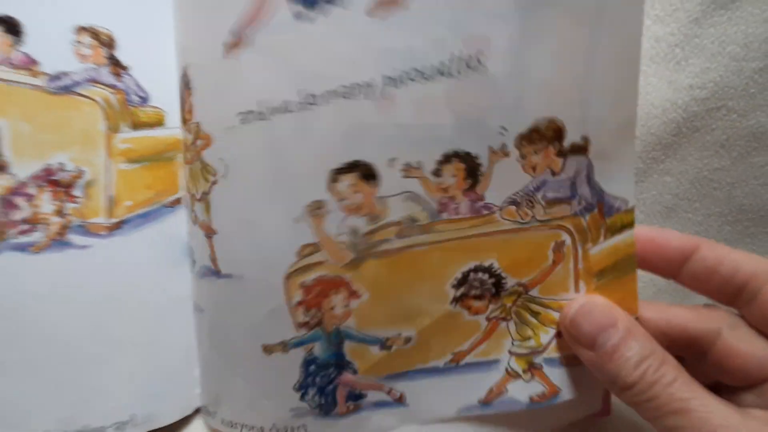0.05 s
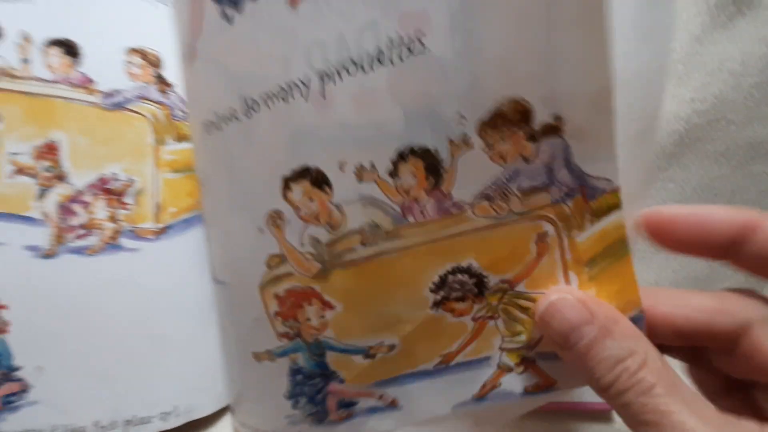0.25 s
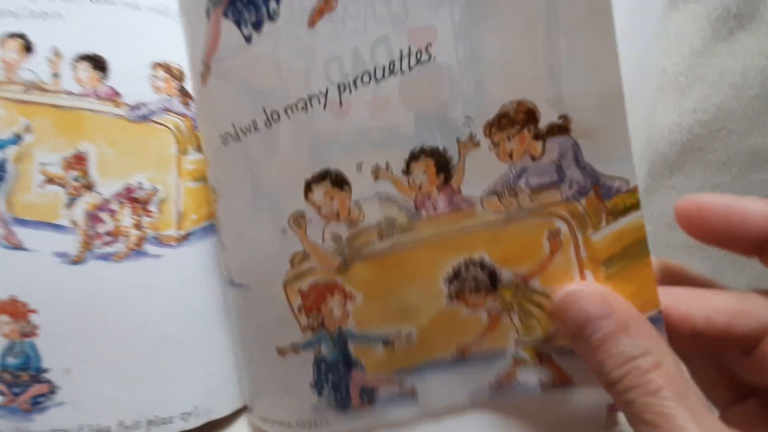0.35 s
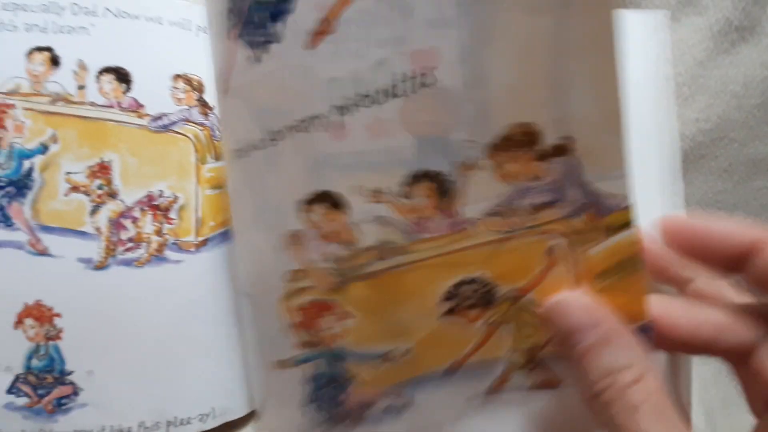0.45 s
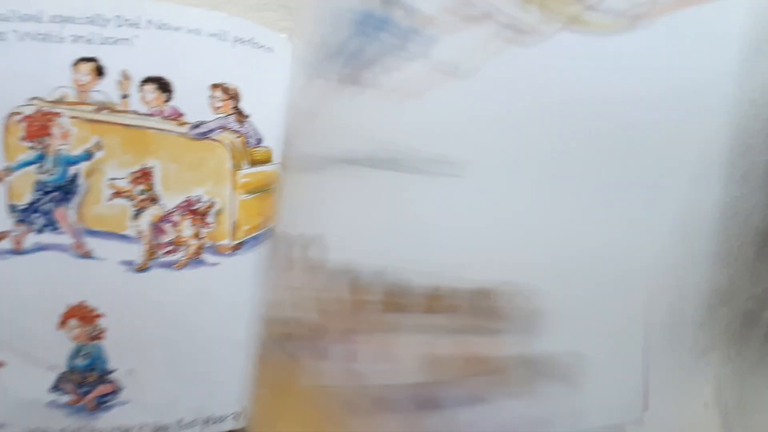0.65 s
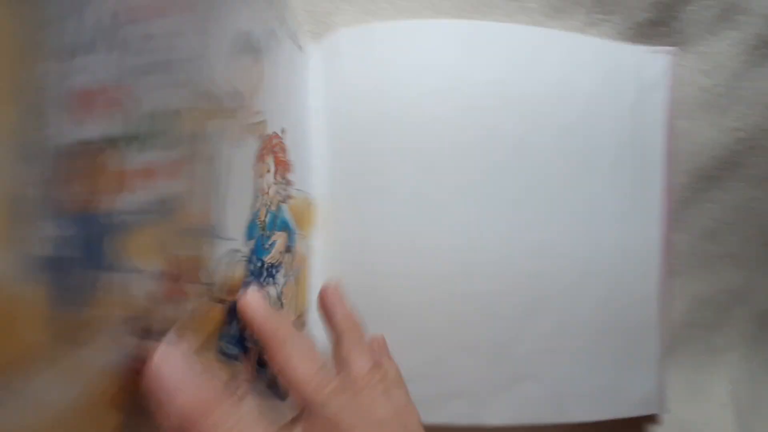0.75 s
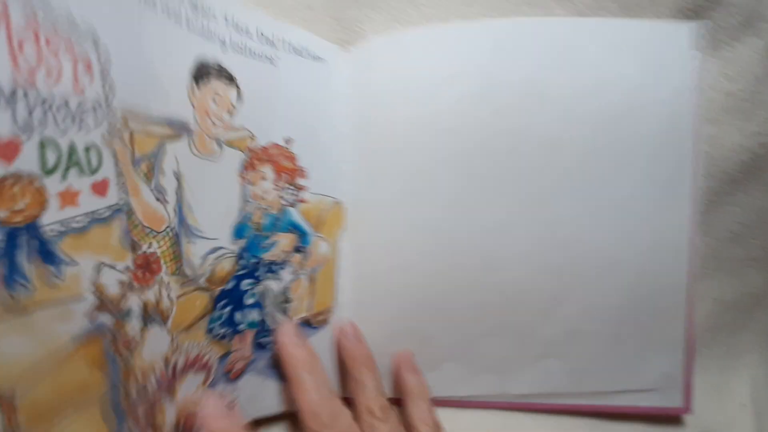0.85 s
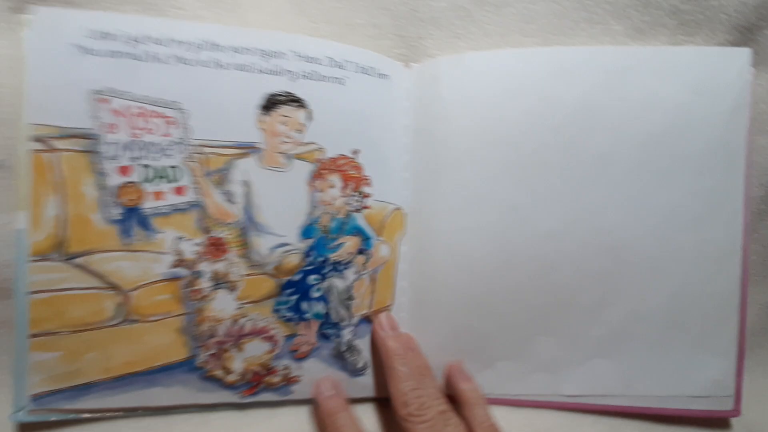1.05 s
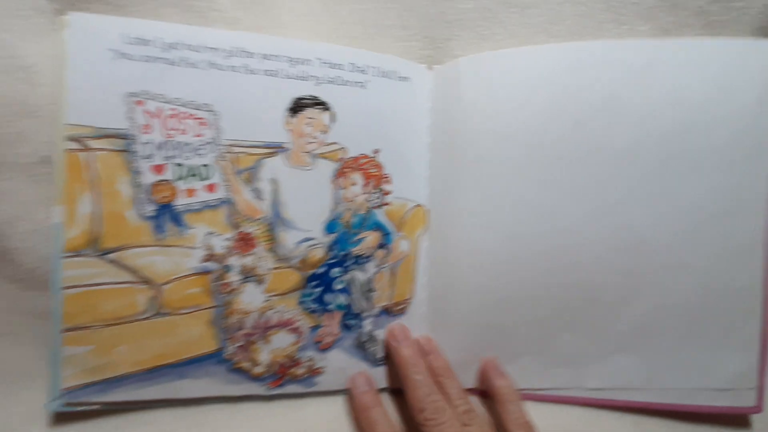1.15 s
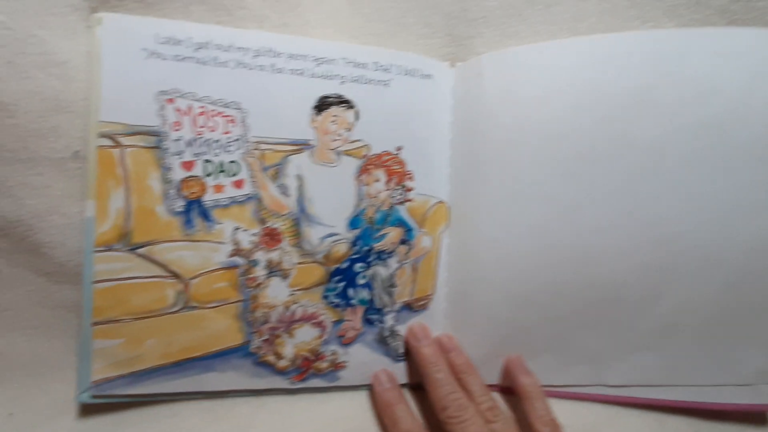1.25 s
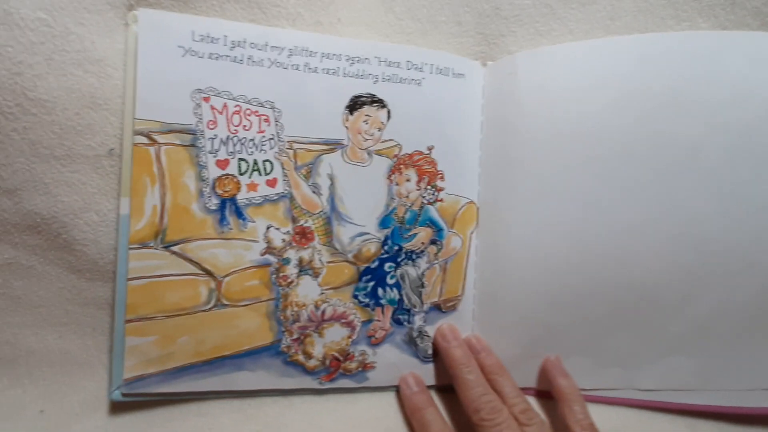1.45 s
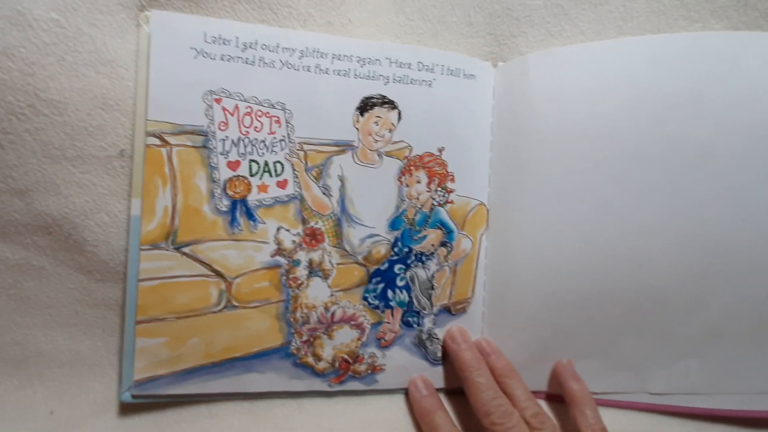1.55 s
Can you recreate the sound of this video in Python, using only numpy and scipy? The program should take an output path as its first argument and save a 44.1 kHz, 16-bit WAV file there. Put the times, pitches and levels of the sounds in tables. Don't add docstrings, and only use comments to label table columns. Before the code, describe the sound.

Close stereo pickup of a single heavy paper page turning, mostly left of centre: rustle and buckling pops, a brief lull, loud crisp snaps, a low soft thump, light skin rubbing and a last sticky tick at right.

```python
import sys
import numpy as np
from scipy import signal
from scipy.io import wavfile
from scipy.ndimage import uniform_filter1d

SR = 44100
rng = np.random.default_rng(int(sys.argv[2]) if len(sys.argv) > 2 else 0)


def ratio(d):
    e = np.asarray(d, float) / 20
    return 10 ** e


def transcribe(signal):
    frames = np.atleast_2d(signal).T
    limited = np.clip(frames, -1, 1)
    pcm = np.round(limited * 32767).astype(np.int16)
    wavfile.write(sys.argv[1], SR, pcm)


N = 70560


def rms_one(x):
    return x / np.sqrt(np.mean(x ** 2) + 1e-20)


def at_hz(points, hz):
    point_hz, value = np.transpose(points)
    return np.interp(np.log(hz), np.log(point_hz), value)


def drift(rate_hz):
    r = np.exp(-40 * np.pi * rate_hz / SR)
    slow = signal.lfilter([1], [1, -2 * r, r * r], rng.standard_normal(N // 20 + 2002))[2000:]
    return np.interp(np.arange(N) / 20, np.arange(len(slow)), rms_one(slow))


def peak(x, hz, width_hz):
    r = np.exp(-np.pi * width_hz / SR)
    zeros = np.array([1, 0, -1]) * (1 - r * r) / 2
    poles = [1, -2 * r * np.cos(2 * np.pi * hz / SR), r * r]
    return signal.lfilter(zeros, poles, x)


def grains(per_s, spread_db, size):
    chance, strength, sign = rng.random((3, *size))
    clicks = (chance < per_s / SR) * ratio(-spread_db * np.log(strength + 0.0026))
    return rms_one(clicks * np.sign(sign - .5))


def banded(spectrum, white, patchy_db, rate_hz):
    # (frequency [Hz], left-right likeness [-1..1])
    likeness = [(40, 0.1), (250, 0.23), (600, 0.97), (1500, -0.52), (3000, -0.42), (8000, -0.024),
                (14000, 0.064)]
    out, together = 0, drift(rate_hz)
    low_hz, high_hz = spectrum[0][0], spectrum[-1][0]
    edges_hz = np.geomspace(low_hz, high_hz, int(3 * np.log2(high_hz / low_hz)) + 1)
    for k, (low, high) in enumerate(zip(edges_hz, edges_hz[1:])):
        sos = signal.butter(2, [low, high], "band", fs=SR, output="sos")
        mid, side = signal.sosfilt(sos, white[k % 2])
        hz = np.sqrt(low * high)
        alike = np.clip(at_hz(likeness, hz), -.95, .95)
        flicker_db = patchy_db * (together + 1.2 * drift(rate_hz))
        stereo = np.sqrt(1 + alike) * mid + np.sqrt(1 - alike) * side * [[1], [-1]]
        out = out + ratio(at_hz(spectrum, hz) + flicker_db) * stereo
    return rms_one(out)


def gate(start_s, length_s, rise_s, fall_s):
    t = np.arange(N) / SR - start_s
    return np.clip(t / rise_s, 0, 1) * np.exp(-np.maximum(t - length_s, 0) / fall_s)


def placed(x, share):
    # (time [s], left minus right [dB])
    place = [
        (0, 8.5),
        (.45, 8),
        (.52, -1),
        (.59, 13.5),
        (0.679, 14),
        (.72, 3.5),
        (.77, 7.5),
        (1.201, 6.5),
        (1.6, -10.5),
    ]
    s, left_db = np.transpose(place)
    return x * ratio(share * np.interp(np.arange(N) / SR, s, left_db) * [[.3], [-.7]])


def strokes():
    # (time [s], length [s], rub level [dB], flex level [dB], air level [dB])
    stroke_table = [(0.0, 0.024, -51, -59, -62), (0.03, 0.079, -47.5, -47, -54),
                    (0.133, 0.019, -85, -100, -46.5), (0.157, 0.063, -57, -52, -64),
                    (0.195, 0.029, -48, -39, -51), (0.244, 0.012, -39, -65, -41.5),
                    (.265, 0.0099, -46, -28, -34), (0.274, 0.048, -50, -43, -43.5),
                    (0.3, 0.027, -38.5, -40, -56), (0.336, 0.024, -36, -27.5, -38),
                    (0.369, 0.065, -37, -37, -48.5), (0.507, 0.034, -63.5, -54, -47.5),
                    (0.553, 0.041, -54, -56.5, -54), (0.59, 0.028, -39, -36.5, -40.5),
                    (0.639, 0.025, -42, -48.5, -83.5), (0.662, 0.023, -40, -30, -30),
                    (0.695, 0.032, -70.5, -30, -32), (0.75, 0.03, -40, -35, -31),
                    (0.778, 0.057, -41.5, -37.5, -40.5), (0.843, 0.031, -41, -49.5, -43),
                    (0.875, 0.051, -43, -59, -54.5), (0.918, 0.043, -75.5, -47.5, -55.5),
                    (0.964, 0.082, -54, -66.5, -68.5), (1.077, 0.082, -56, -81, -95.5),
                    (1.118, 0.061, -52.5, -87, -97), (1.185, 0.036, -59.5, -85, -80),
                    (1.269, 0.048, -78.5, -93, -77.5), (1.328, 0.035, -67, -81, -86),
                    (0.669, .005, -39.5, -62, -56.5)]
    # (frequency [Hz], level [dB per Hz])
    rub_spectrum = [(700, -50), (1050, -27.5), (1350, -9.5), (2030, -12), (6080, -16.5), (8550, -22),
                    (15200, -23.5), (15900, -17), (16500, -35)]
    flex_spectrum = [(88, -37), (150, -9), (485, -6.5), (794, 1), (1360, -4), (2070, -6), (2450, 2.5),
                     (3390, -17), (6000, -31), (7800, -47.5), (13200, -120)]
    air_spectrum = [(25, -23.5), (50, -10), (80, -6), (130, -10), (250, -14), (500, -23)]
    shapes = np.array([gate(s, length_s, 0.0018 + 0.21 * length_s, 0.0013 + 0.33 * length_s)
                       for s, length_s, *_ in stroke_table])
    power = ratio(2 * np.array(stroke_table)[:, 2:].T)
    rub, flex, air = np.sqrt(power @ shapes ** 2)
    air = uniform_filter1d(air, size=600)

    hiss = banded(rub_spectrum, grains(15000, 2.0, size=(2, 2, N)), patchy_db=1.2, rate_hz=70)
    hiss = signal.sosfilt(signal.butter(4, 1100, "high", fs=SR, output="sos"), hiss)
    rustle = banded(flex_spectrum, grains(4000, 2.5, size=(2, 2, N)), patchy_db=1.5, rate_hz=50)
    puff = banded(air_spectrum, rng.standard_normal((2, 2, N)), patchy_db=0.0, rate_hz=11)
    return placed(rub * hiss + flex * rustle, share=0.31) + placed(air * puff, share=0.64)


def room_hush():
    # (frequency [Hz], level [dB per Hz])
    hush_spectrum = [(25, -15.5), (100, -0.5), (800, -25), (1100, -20), (1400, -1.5), (2600, -8),
                     (4200, -18.5), (6000, -15), (16500, -17.5)]
    return ratio(-69) * banded(hush_spectrum, rng.standard_normal((2, 2, N)), patchy_db=0.5, rate_hz=25)


def pops():
    # (time [s], peak level [dB], pitch [Hz], length [s], right minus left [dB])
    pop_table = [(.051, -33, 1700, .001, -6), (.0555, -31, 1950, .0015, -6), (.0595, -31, 1950, .0015, -6),
                 (.0675, -33, 1800, .0015, -6), (.073, -33, 1650, .001, -6), (.095, -36, 2100, .0015, -6),
                 (.1003, -34, 2000, .0015, -6), (.2715, -18, 1500, .001, -8), (.3447, -7, 1700, .0008, -8),
                 (.3477, -5, 2100, .0006, -8), (.352, -11, 1300, .001, -7), (.3555, -14, 900, .0015, -6),
                 (.3615, -12, 1700, .0008, -7), (.3655, -17, 1500, .001, -7), (.37, -19, 1000, .0015, -6),
                 (.6075, -22, 420, .001, -12), (.803, -30, 2050, .003, -5), (.612, -20, 1500, .0008, -12),
                 (.6762, -2, 2300, .0006, -16), (.679, -17, 1460, .0006, -14), (.686, -17, 2600, .001, -12),
                 (.7003, -4, 2300, .0004, -11), (.7013, -5, 2000, .0005, -11),
                 (.7046, -5, 2600, .0005, -11), (.7065, -8, 3000, .0006, -11),
                 (.7088, -5, 2300, .0005, -11), (.7124, -6, 2200, .0004, -11),
                 (.7195, -21, 1400, .0008, -9), (.7225, -21, 1350, .0008, -9),
                 (1.2775, -57, 1480, .0007, -4), (1.3085, -62, 1550, .0008, -2),
                 (1.553, -61, 1530, .0004, 3), (1.568, -65, 1600, .0005, 3)]
    out, turns = np.zeros((2, N)), rng.random((len(pop_table), 2, 1))
    for (s, db, hz, length_s, right_db), turn in zip(pop_table, turns):
        t = np.maximum(np.arange(N) / SR - s + length_s, 0)
        swell = (t / length_s * np.exp(1 - t / length_s)) ** 2
        cycles = np.sin(2 * np.pi * (hz * t + turn * [[1], [0.3]]))
        out += ratio([[db], [db + right_db]]) * swell * cycles
    return out


def snaps():
    # (time [s], peak level [dB], pitch [Hz], crack level [dB], ring T60 [s])
    snap_table = [(0.0762, -12, 790, -38, 0.0082), (0.1414, -18.5, 910, -17.5, 0.022),
                  (0.18, -37.5, 1510, -11, 0.031), (0.1973, -22, 2330, -21, 0.0093),
                  (0.2128, -8, 1530, -19.5, 0.008), (0.2466, -10, 690, -14, 0.01),
                  (0.2676, -6, 744, -23.5, 0.02), (0.2794, -25, 1690, -18, 0.039),
                  (0.309, -23, 916, -17, 0.032), (0.317, -25.5, 2020, -11, 0.028),
                  (0.3429, -9.5, 1780, -10, 0.027), (0.4322, -7.5, 2550, -35, 0.025),
                  (.504, -47.5, 1600, -12, 0.072), (.523, -41, 2000, 7.5, 0.01),
                  (0.559, -52.5, 1410, 7, 0.01), (0.6648, -16.5, 1360, -10.5, 0.011),
                  (0.9059, -26.5, 2260, -7.5, 0.018), (1.2, -55, 14740, -23.5, 0.046),
                  (1.135, -53, 6000, -16.5, .01), (1.161, -48, 11800, -24, 0.024),
                  (1.501, -51, 11000, -10.5, .015)]
    size = 4000
    out, t = np.zeros((2, N + size)), np.arange(size) / SR
    push = ratio(-23.5) * np.sin(2 * np.pi * 150 * t) * ratio(-60 * t / 0.023)
    for s, db, hz, crack_db, t60_s in snap_table:
        noise = rng.standard_normal((4, size))
        ping = 2 * np.sin(2 * np.pi * hz * t) * ratio(-60 * t / (0.16 * t60_s)) * np.clip(2 * t * hz, 0, 1)
        tail = peak(peak(noise[:2], hz, 1.7 * hz), hz, 1.7 * hz)
        tail = ratio(-15.5) * rms_one(tail) * ratio(-60 * t / t60_s)
        crack = ratio(crack_db) * signal.lfilter([1], [1, -.4], noise[2:]) * ratio(-60 * t / 0.015)
        left = ping + push + tail[0] + crack[0]
        right = .8 * ping - .4 * push
        right = right + 0.43 * tail[0] + 2.8 * tail[1]
        right = right - 0.33 * crack[0] + 0.43 * crack[1]
        i = int(s * SR)
        out[:, i:i + size] += ratio(db) * np.array([left, right])
    return out[:, :N]


def crunches():
    # (time [s], length [s], level [dB], pitch [Hz], width [Hz])
    crunch_table = [
        (0.339, 0.007, -23, 1762, 1207),
        (0.353, 0.016, -29, 1260, 1570),
        (0.414, 0.0046, -30.5, 1728, 1580),
        (0.607, 0.011, -35, 1210, 1140),
        (0.669, 0.023, -29.5, 2000, 1480),
        (0.6996, 0.012, -21, 2350, 1900),
        (0.773, 0.0042, -30.5, 1360, 2000),
        (0.863, 0.0038, -40.5, 5700, 3500),
    ]
    out, clicks = 0, grains(4000, 2.0, size=(2, N))
    for s, length_s, db, hz, width_hz in crunch_table:
        band_hz = [max(hz - width_hz / 2, 200), hz + width_hz / 2]
        body = signal.sosfilt(signal.butter(2, band_hz, "band", fs=SR, output="sos"), clicks)
        body = peak(body, hz, 2 * width_hz)
        body = body / np.sqrt(uniform_filter1d(body ** 2, size=200) + 1e-12)
        out = out + ratio(db) * gate(s, length_s, rise_s=.0004, fall_s=0.0033) * body
    return out


def landing():
    start_s, hz, level_db, t60_s = .77, 81, -12, .12
    t = np.maximum(np.arange(N) / SR - start_s, 0)
    thump = np.clip(t / .015, 0, 1) * np.sin(2 * np.pi * hz * t)
    return ratio(level_db - 60 * t / t60_s) * thump * [[1], [-.1]]


def peel():
    # (time [s], length [s], level [dB])
    peel_table = [
        (1.4139, 0.0011, -39),
        (1.418, 0.001, -41),
        (1.4246, 0.0028, -30.5),
        (1.428, 0.0022, -28.5),
        (1.436, 0.0016, -28.5),
        (1.442, 0.0013, -44),
        (1.444, 0.0097, -47.5),
        (1.45, 0.05, -61),
    ]
    # (frequency [Hz], width [Hz], level [dB])
    peel_bands = [(441, 1000, -28.5), (2000, 4700, -8.5), (5516, 3700, 1.5), (11020, 3480, -1),
                  (13960, 2900, -40)]
    clicks = grains(8000, 2.5, size=(2, N))
    body = 0
    for hz, width_hz, db in peel_bands:
        body = body + ratio(db) * rms_one(peak(peak(clicks, hz, width_hz), hz, width_hz))
    shape = sum(ratio(db) * gate(s, length_s, 0.000352, 0.0011 + 0.74 * length_s)
                for s, length_s, db in peel_table)
    return shape * rms_one(body) * ratio([[-1.5], [0]]) * [[1], [-1]]


def room(x):
    t60_s, level_db = 0.057, -17.5
    t = np.arange(9000) / SR
    tail = signal.lfilter([1], [1, -.6], rng.standard_normal((2, 9000)))
    tail = tail * ratio(-60 * t / t60_s) * (t > .003)
    return ratio(level_db) * signal.fftconvolve(x, tail / np.linalg.norm(tail[0]), axes=1)[:, :N]


def scene():
    hits = placed(snaps() + crunches(), share=0.89) + peel() + pops()
    return hits + room(hits) + strokes() + landing() + room_hush()


def roll_off(x):
    return signal.sosfilt(signal.butter(12, 16960, fs=SR, output="sos"), x)


def record(dry):
    # (frequency [Hz], width [Hz], lift [dB])
    mic_peaks = [
        (1480, 130, 4),
        (2037, 27, 6),
    ]
    x = dry - 0.74 * peak(dry, 8980, width_hz=2100)
    x = x + (ratio([[2.5], [0]]) - 1) * peak(x, 2000, width_hz=2000)
    for hz, width_hz, lift_db in mic_peaks:
        x = x + (ratio(lift_db) - 1) * peak(x, hz, width_hz)
    x = signal.sosfilt(signal.butter(2, 51, "high", fs=SR, output="sos"), x)
    x = np.clip(x, -.9, .9)
    x = signal.sosfilt(signal.cheby2(12, 70, 17100, fs=SR, output="sos"), x)
    return roll_off(x)


dry = scene()
out = record(dry)
transcribe(out)
```